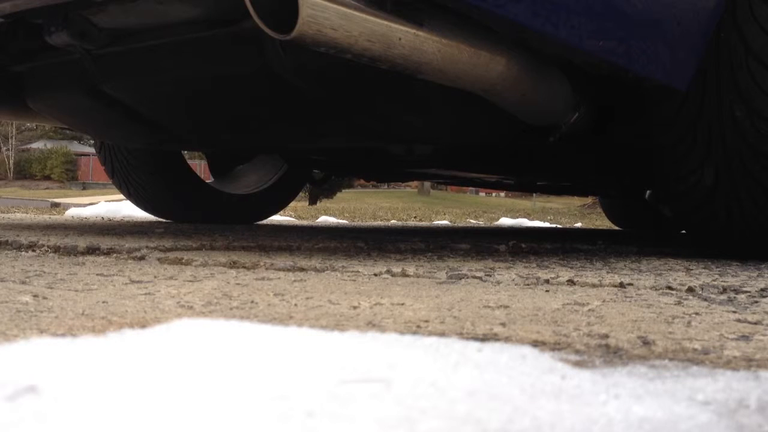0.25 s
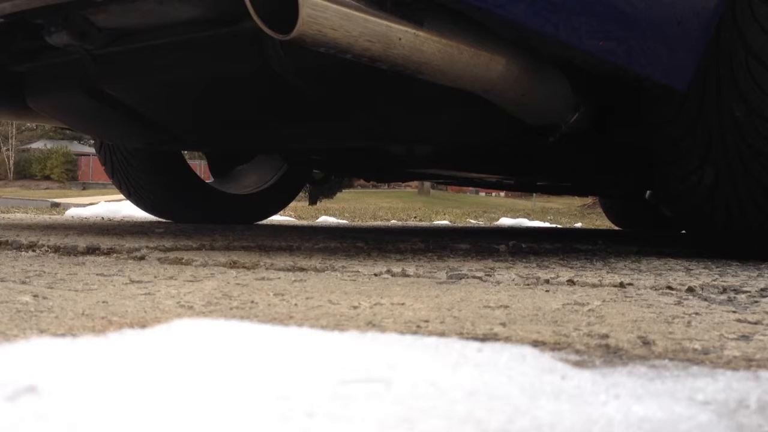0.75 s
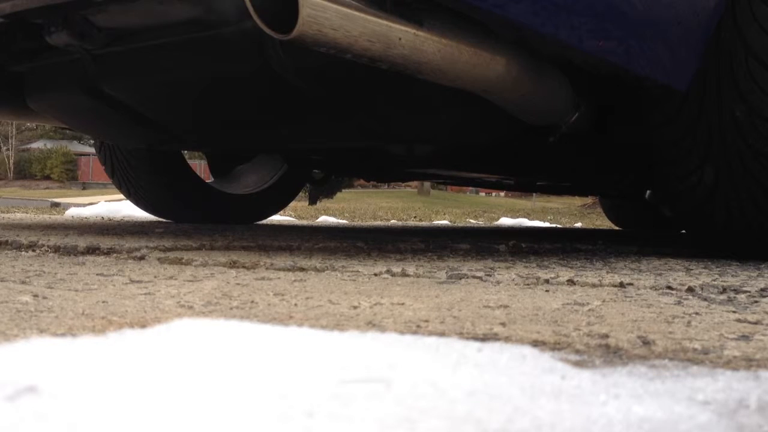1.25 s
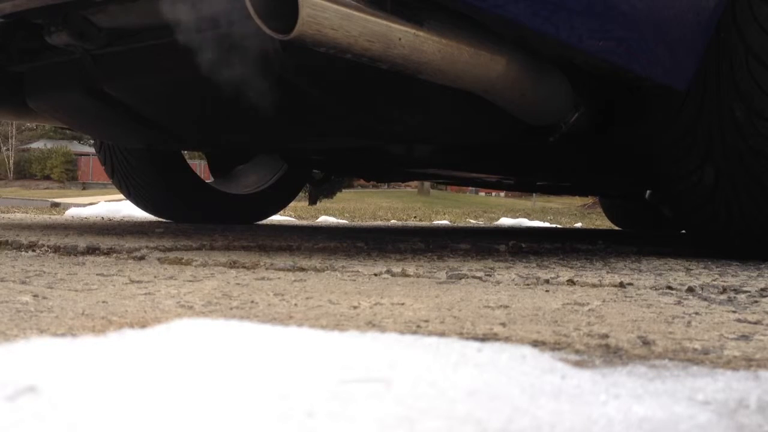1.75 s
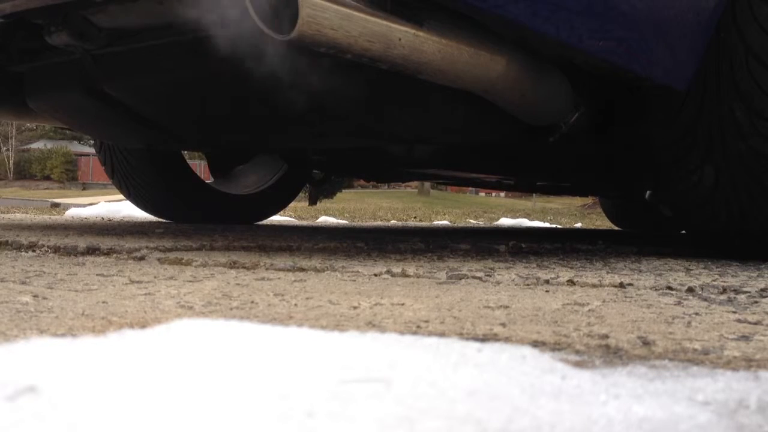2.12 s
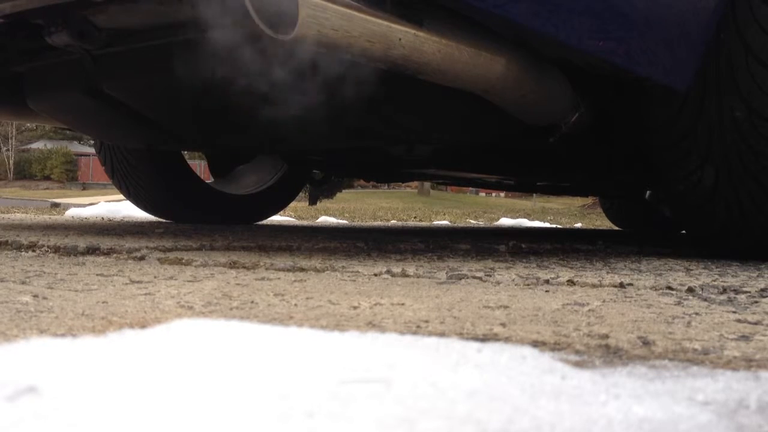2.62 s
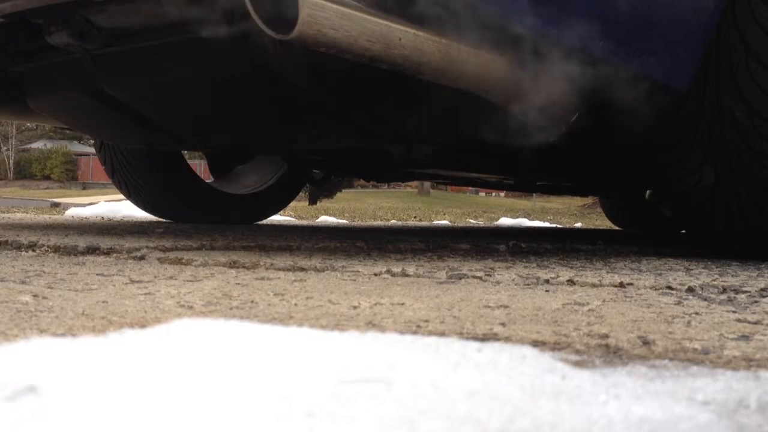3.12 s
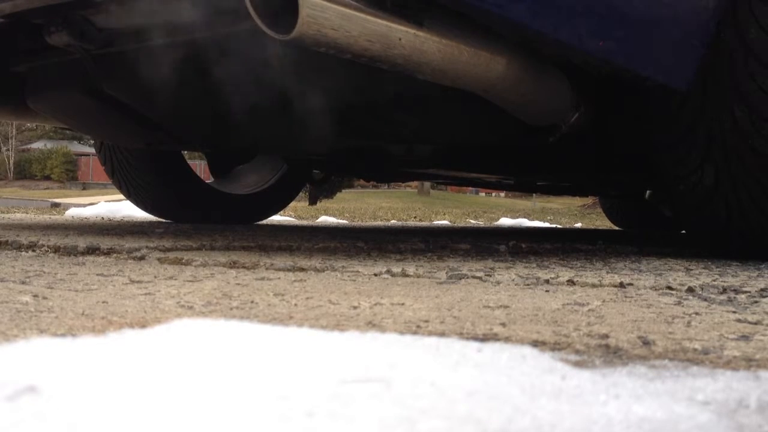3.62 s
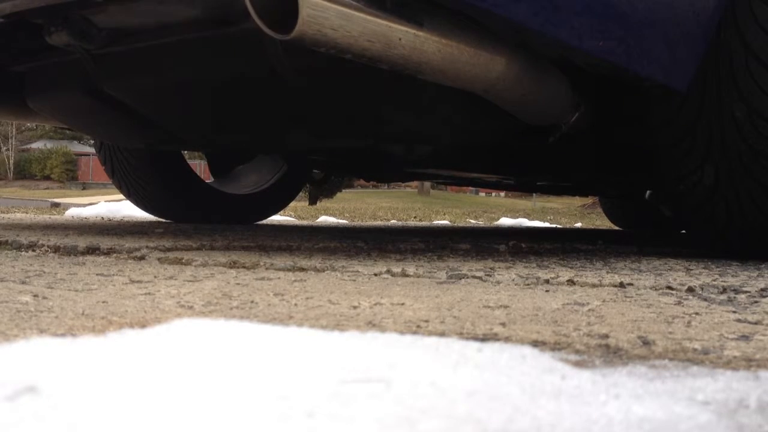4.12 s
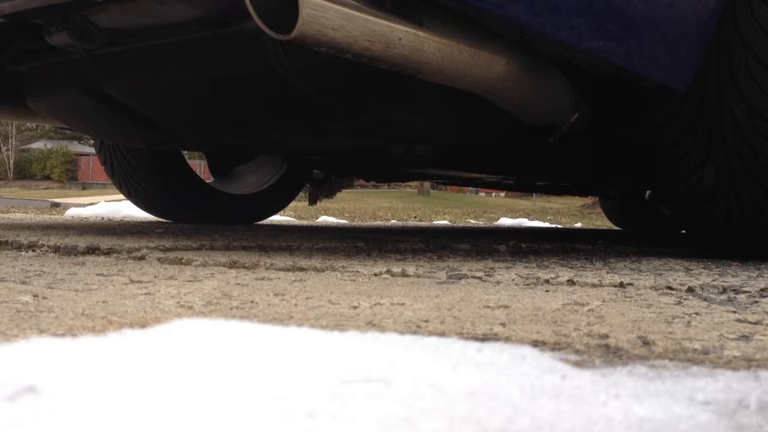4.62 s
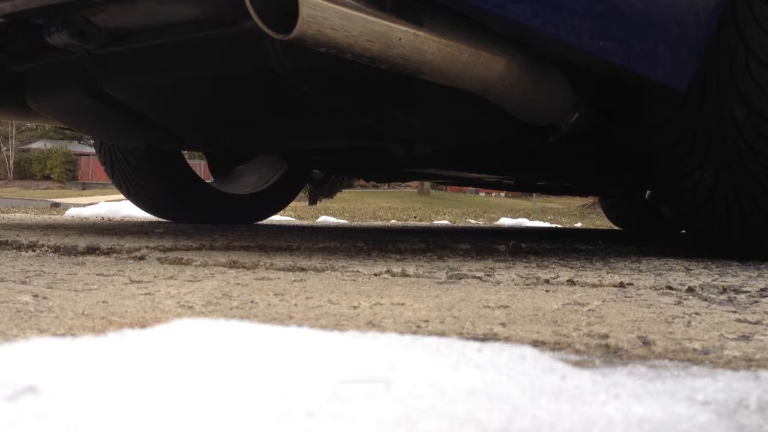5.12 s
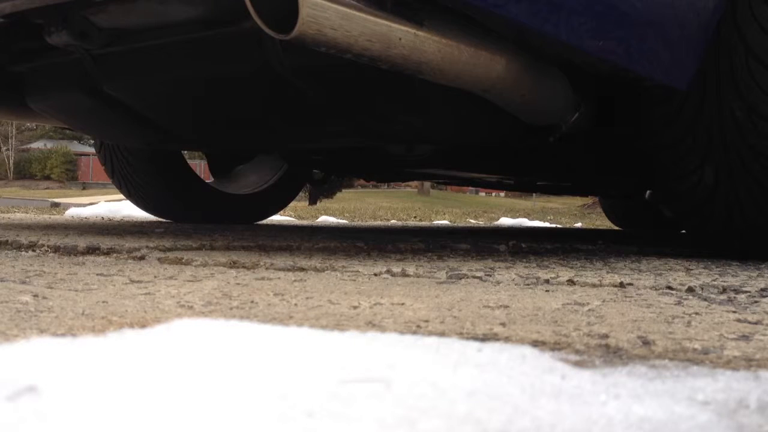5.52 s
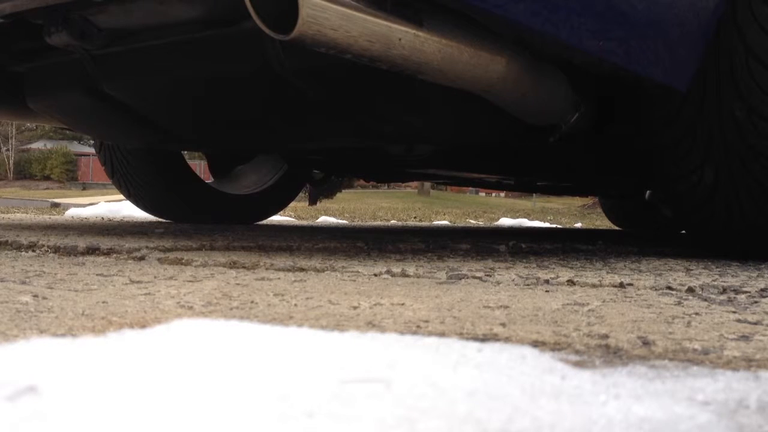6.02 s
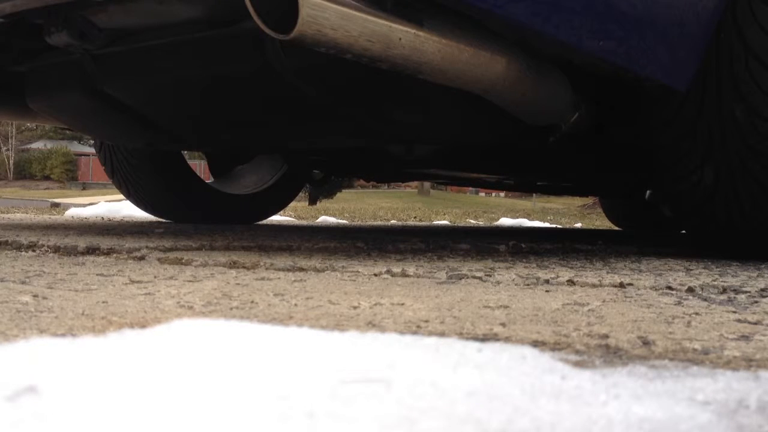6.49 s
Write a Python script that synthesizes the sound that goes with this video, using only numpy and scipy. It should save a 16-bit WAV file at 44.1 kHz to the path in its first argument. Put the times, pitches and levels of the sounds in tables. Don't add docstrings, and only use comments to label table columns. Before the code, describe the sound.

A car's uneven eight-cylinder exhaust throbs at idle on a driveway, then shuts off, gulping and thumping to rest before squeaks, clinks and quiet.

```python
import sys
import numpy as np
from scipy import signal
from scipy.fft import rfft, irfft
from scipy.io import wavfile
from scipy.ndimage import uniform_filter1d

SR = 44100
rng = np.random.default_rng(int(sys.argv[2]) if len(sys.argv) > 2 else 0)


def volts_from_decibels(level):
    exponent = np.asarray(level, float) / 20
    return 10 ** exponent


def log_audio(samples):
    frames = np.atleast_2d(samples).T
    limited = np.clip(frames, -1, 1)
    pcm = np.round(limited * 32767).astype(np.int16)
    wavfile.write(sys.argv[1], SR, pcm)


N = 297665

# time in seconds, firing rate in Hz.
IDLE = [(0, 54.78), (0.55, 53.98), (1.1, 53.8), (1.6, 55.05), (2.0, 54.61), (2.5, 55.48), (3.2, 54.51),
        (3.95, 54.08), (4.2, 56.79), (4.75, 57.03), (4.9, 57.87)]
LOAD_OFF_S, IGNITION_OFF_S, CUT_TAKES_S = 4.1, 4.89, .004


def level(x, db):
    return x * volts_from_decibels(db) / np.sqrt(np.mean(x ** 2))


def band(x, hz, width):
    return signal.lfilter(*signal.iirpeak(hz, hz / width, SR), x)


def ring(x, modes):
    total = 0
    for k, (hz, width, db) in enumerate(modes):
        total = total + (-1) ** k * volts_from_decibels(db) * band(x, hz, width) * hz / width
    return total


def coloured(spectrum):
    hz, db = np.transpose(spectrum)
    f = np.fft.rfftfreq(N, 1 / SR) + 1
    gain = volts_from_decibels(np.interp(np.log(f), np.log(hz), db, -90, -90))
    return level(irfft(rfft(rng.standard_normal(N)) * gain, N), 0)


def walk(rate):
    k = int(SR / rate)
    held = np.repeat(rng.standard_normal(N // k + 1), k)
    return uniform_filter1d(uniform_filter1d(held, k), k)[:N]


def curve(rows):
    s, *columns = np.transpose(rows)
    return [np.interp(np.arange(N) / SR, s, c) for c in columns]


def burst(at, rise, fall):
    t = np.arange(N) / SR - at
    return np.exp(np.where(t < 0, t / rise, -t / fall))


def step(at, takes):
    return .5 + .5 * np.tanh((np.arange(N) / SR - at) / takes)


def engine():
    # mode in Hz, width in Hz, level in dB.
    chuff_modes = [(971, 13.6, 2), (723, 18, -1), (1498, 52, -2.6)]
    hz = speed()
    firing = 8 * .99 + np.cumsum(hz) / SR
    boom_db, drone_db, rasp_db, clatter_db, hiss_db = layer_levels(hz)
    pulses = strokes(hz, firing)
    boom, drone, rasp, bark = exhaust(pulses, hz)
    chuff = level(ring(np.roll(pulses[0], int(.012 * SR)), chuff_modes), 0)
    clatter, valves = valve_gear(hz, firing)
    pipes = volts_from_decibels(boom_db) * boom + volts_from_decibels(drone_db + 0.37) * drone + volts_from_decibels(rasp_db + 2.5) * rasp
    hard = volts_from_decibels(clatter_db) * (clatter + volts_from_decibels(-11) * bark + volts_from_decibels(-11.5) * chuff)
    return pipes + breath(hz, firing) + hard + volts_from_decibels(hiss_db) * valves


def speed():
    drag_hz_per_s, rest_hz = 60, 3.2
    idle_hz, = curve(IDLE)
    since_cut = np.maximum(np.arange(N) / SR - IGNITION_OFF_S, 0)
    return np.maximum(idle_hz - drag_hz_per_s * since_cut, rest_hz)


def layer_levels(hz):
    # idle level in dB, change without load in dB, change at the cut in dB,
    # dB lost per halving of speed.
    layers = [
        (-23.5, 1.5, -7.5, 6.5),
        (-23, -2, -5, 9.5),
        (-27.5, -4, 3.5, 18),
        (-32, 0, 6.5, 9),
        (-59.5, -1.5, 5.5, 8),
    ]
    # time in seconds, length in seconds,
    # then boom, drone and rasp in dB above the run-down level.
    gulps = [(4.918, 0.0066, 8, 10.5, -2), (4.99, 0.075, 10.5, 15, 12.5), (5.091, 0.025, 12.5, 16, -0.5),
             (5.141, 0.035, 19.5, 7, 6), (5.174, 0.029, 13, 13.5, 10), (5.273, 0.051, 16.5, 5, 5),
             (5.326, 0.034, 7, 14.5, 5), (5.392, 0.042, 16, -2, 7.5), (5.491, 0.041, 13, 12.5, -3),
             (5.568, 0.028, 9, -6, 15), (5.628, 0.011, 8, -7, 2)]
    t = np.arange(N) / SR
    cut, unloaded = step(IGNITION_OFF_S, CUT_TAKES_S), step(LOAD_OFF_S, .05)
    halvings = np.log2(IDLE[-1][1] / hz) + np.maximum(t - 5.8, 0) * 4
    db = np.array([idle + free * unloaded + cut * (jump - loss * halvings)
                   for idle, free, jump, loss in layers])
    for s, length, *swell_db in gulps:
        db[:3] += np.outer(swell_db, np.exp(-((t - s) / length) ** 2))
    return db


def strokes(hz, firing):
    # boom, drone, rasp and bark in dB.
    loaded = [(-21, -3.5, -8, -10.5), (-9, -8, -4.5, -16), (-14, -5.5, -8, -3.5), (1.5, -5, -19, -10.5),
              (-5.5, -25, -19.5, -10), (-16.5, -5, -21.5, 0), (-21.5, -10, -14.5, 0), (-20, -24, -0.5, -9)]
    # boom, drone, rasp and bark in dB.
    unloaded = [(-15.5, -17, -10, -12.5), (-19.5, -0.5, 0, -11), (-11.5, -11.5, -25, -8.5),
                (-1.5, -4.5, -24, -7.5), (-7.5, -4.5, -29, -3), (-2, 0.5, -19, -4), (-12, -7.5, -12, -9),
                (-33.5, -27, -1, -8.5)]
    at = np.flatnonzero(np.diff(np.floor(firing)) > 0)
    cylinder = np.floor(firing[at + 1]).astype(int) % 8
    chance = rng.standard_normal((400, 5))[:len(at)]
    jitter_s = np.where(at < IGNITION_OFF_S * SR, .0001, .002) * chance[:, 4]
    at = np.clip(at + (jitter_s * SR).astype(int), 0, N - 1)
    burning = (at < IGNITION_OFF_S * SR)[:, None]
    under_load = (at < LOAD_OFF_S * SR)[:, None]
    pattern_db = np.where(under_load, np.array(loaded)[cylinder], np.array(unloaded)[cylinder])
    pattern_db = pattern_db * np.where(burning, 1, .3) - 6 * ~burning
    ragged_db = np.where(burning, .9, 2.5) * chance[:, :4]
    size = volts_from_decibels(pattern_db + ragged_db) * np.sqrt(55 / hz[at])[:, None]
    pulses = np.zeros((4, N))
    pulses[:, at] = size.T
    return pulses


def exhaust(pulses, hz):
    # centre in Hz, width in Hz, level in dB.
    boom_modes = [(121, 13, 0), (143, 11, -3)]
    drone_modes = [(234.35, 5.5, 8), (218.4, 12, 0), (251.7, 26, -2.5), (193.2, 9.2, 3)]
    rasp_modes = [(330.3, 14.7, -2), (360.4, 8.7, 5.5), (426.7, 29, 2.5), (460.4, 12.3, 0),
                  (404, 30, -24.5)]
    bark_modes = [(558.6, 31, 0.5), (700.5, 14.6, -7), (800, 22, -1.5), (851, 8.7, -4.5), (997.4, 63, 1.5)]
    # centre in Hz, width in Hz, level in dB.
    boom_cold = [(127.2, 7.8, -1.5)]
    puff = .012 * coloured([(60, 0), (1200, 0)])
    share = np.array([[.03], [.08], [.1], [.06]])
    gas = pulses + share * puff * np.clip(55 / hz, 1, 4) ** 1.2
    gas = signal.sosfilt(signal.butter(4, 1200, fs=SR, output="sos"), gas)
    gas[0] = np.roll(band(gas[0], 128, 36), int(.004 * SR))
    others = [pipe(g, modes, cooled(modes))
              for g, modes in zip(gas[1:], (drone_modes, rasp_modes, bark_modes))]
    return [pipe(gas[0], boom_modes, boom_cold), *others]


def cooled(modes):
    return [(hz * .93, width, db) for hz, width, db in modes]


def pipe(gas, hot, cold):
    cut = step(IGNITION_OFF_S + 0.091, 0.039)
    return level(ring(gas * (1 - cut), hot) + ring(gas * cut, cold), 0)


def breath(hz, firing):
    gain = volts_from_decibels(-32 + 5 * step(IGNITION_OFF_S, CUT_TAKES_S))
    return gain * np.sin(2 * np.pi * firing) * (hz / 55) ** .7 * step(5.4, -.08)


def valve_gear(hz, firing):
    # frequency in Hz, density in dB per Hz.
    clatter_spectrum = [(280, -4), (480, -0.5), (505, -14), (563, -5.5), (618, -17), (713, -6.5),
                        (844, -15.5), (983, -12.5), (1200, -17.5), (1510, -14), (1820, -18.5),
                        (2940, -23.5), (3600, -46), (4680, -63), (7920, -120)]
    valve_spectrum = [(1940, -49.5), (3300, 4), (3820, 0.5), (4210, 3), (4720, -3), (5330, 1.5), (6020, -2),
                      (6930, -9), (8560, -12), (11000, -24), (14000, -18), (15200, -24)]
    seating = np.exp(3 * (np.cos(2 * np.pi * (firing - .9)) - 1))
    tick = 1 + 0.69 * seating * np.clip(hz / 55, 0, 1) ** 2
    clatter = volts_from_decibels(1.18 * walk(9)) * (1 + 0.21 * tick) * coloured(clatter_spectrum)
    valves = volts_from_decibels(1.2 * walk(20)) * tick * coloured(valve_spectrum)
    return level(clatter, 0.2), level(valves, 5.5)


def air():
    # frequency in Hz, density in dB per Hz.
    rush = [(2650, -32), (4500, -4.5), (6020, 0), (6800, -12), (8550, -8), (9960, -17), (15200, -22.5)]
    flutter = volts_from_decibels(-47 + 1.8 * walk(45))
    return flutter * step(IGNITION_OFF_S, 0.012) * burst(5.04, 3., 0.2) * coloured(rush)


def squeaks():
    # time in seconds, level in dB, rise in seconds, fall in seconds.
    rubs = [
        (5.693, -34, .005, .006),
        (5.709, -41, .004, .008),
        (5.74, -67, .01, .09),
    ]
    # centre in Hz, width in Hz, level in dB.
    part_modes = [(4220, 160, 0), (5250, 200, -17), (3176, 150, -19), (7400, 300, -24), (8400, 600, -21),
                  (12770, 900, -25), (4500, 200, -13)]
    rub = 0
    for hz, width, db in part_modes:
        narrow = band(band(rng.standard_normal(N), hz, width), hz, width)
        rub = rub + volts_from_decibels(db) * level(narrow, 0)
    return rub * sum(volts_from_decibels(db) * burst(s, rise, fall) for s, db, rise, fall in rubs)


def knocks():
    # time in seconds, level in dB, centre in Hz, width in Hz, fall in seconds.
    blows = [(.001, -35, 3240, 5300, 0.0019), (.001, -44, 13000, 10000, 0.0026),
             (1.386, -38, 2430, 880, 0.023), (5.078, -45, 6030, 400, 0.011),
             (5.13, -57, 8200, 500, 0.021), (5.2, -57, 3300, 850, 0.01), (5.199, -33, 1320, 900, .01),
             (5.2, -23, 539, 39.6, 0.027), (5.294, -50, 5800, 340, 0.013),
             (5.398, -51, 4500, 3000, 0.0037), (5.49, -57, 4000, 4000, 0.0056),
             (5.45, -41, 38.89, 30, .15),
             (5.615, -44, 1760, 1800, 0.021), (5.614, -54, 4170, 500, 0.015),
                (5.614, -64, 13800, 1500, .018), (5.614, -68, 10800, 700, 0.014),
                (5.614, -56, 5230, 500, 0.02), (5.8, -42, 490, 170, .018), (5.8, -54, 1980, 1500, 0.015),
                (5.986, -63, 3000, 696, .006), (6.41, -62, 2480, 300, .009), (6.52, -52, 70, 50, .05),
                (6.602, -46, 193, 140, 0.052), (6.605, -36, 267, 200, 0.012),
                (6.605, -45.5, 800, 930, 0.022), (6.624, -51, 690, 260, .013)]
    noise = rng.standard_normal(N)
    total = 0
    for s, db, hz, width, fall in blows:
        strike = burst(s, 0.0068, fall) * level(band(noise, hz, width), db + 5.5)
        total = total + band(band(strike, hz, width), hz, 1.7 * width)
    return total


def far_machine():
    # time in seconds, pitch in Hz, level in dB.
    falling = [(5.55, 400, -70), (5.75, 390, -53), (5.95, 376, -52), (6.1, 358, -55), (6.22, 325, -63),
               (6.36, 292, -56), (6.42, 285, -49), (6.55, 272, -50), (6.75, 262, -51)]
    hz, db = curve(falling)
    gain = volts_from_decibels(db + 3 + 2.5 * walk(25))
    return gain * np.sin(2 * np.pi * np.cumsum(hz * (1 + .01 * walk(40))) / SR)


def street():
    # frequency in Hz, density in dB per Hz.
    wash = [(12, -75), (20, -50.5), (80, -27.5), (103, -7), (156, -2.5), (195, -6), (237, 0.5), (359, -7.5),
            (487, -16), (679, -6.5), (1220, -19.5), (1480, -13), (4870, -40), (10300, -47.5), (15200, -45)]
    swell_db = 9 * burst(5.72, 1., 0.66)
    return volts_from_decibels(swell_db + walk(10)) * level(coloured(wash), -54.4)


def scene():
    return (engine() + air() + squeaks() + knocks() + far_machine() + street())[None]


def top_cut(x):
    return signal.sosfilt(signal.butter(12, 15360, fs=SR, output="sos"), x)


def record(dry):
    mix = signal.sosfilt(signal.butter(3, 100, "high", fs=SR, output="sos"), dry)
    mix = mix + volts_from_decibels(-84) * coloured([(20, 0), (45, 0), (90, 3)])
    mix = mix + volts_from_decibels(-90) * rng.standard_normal(N)
    mix = np.tanh(1.3 * mix) / 1.3
    return top_cut(mix)


dry = scene()
out = record(dry)
log_audio(out)
```